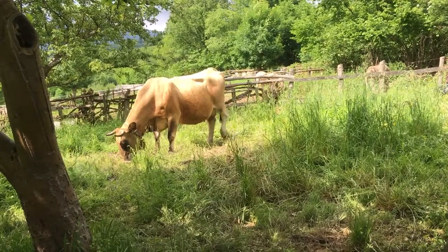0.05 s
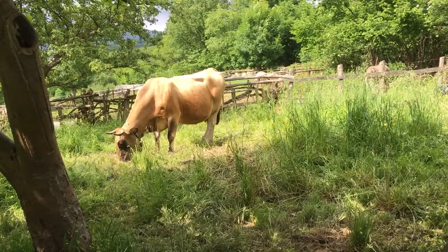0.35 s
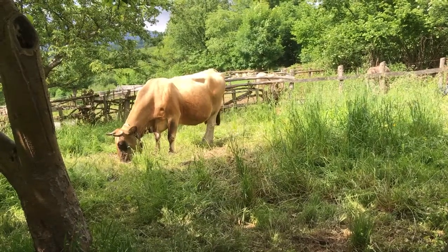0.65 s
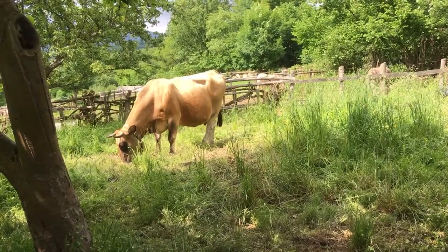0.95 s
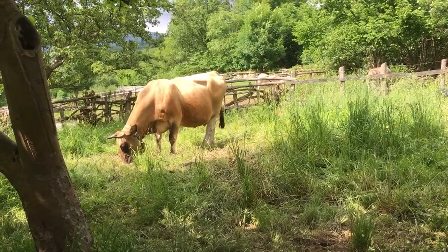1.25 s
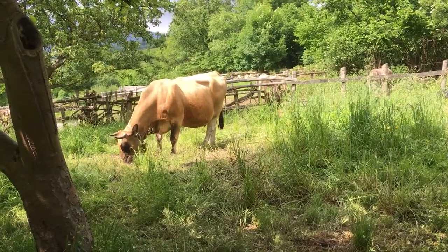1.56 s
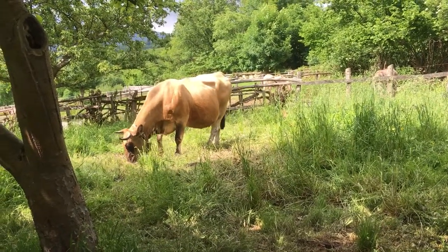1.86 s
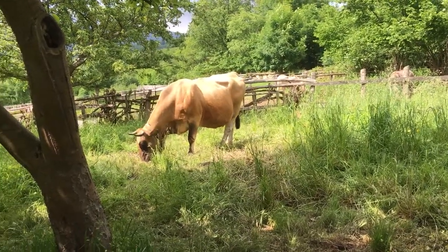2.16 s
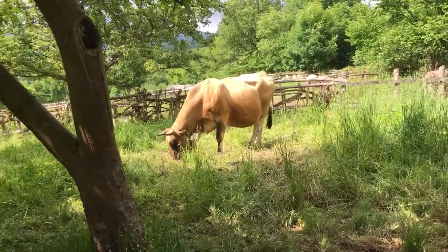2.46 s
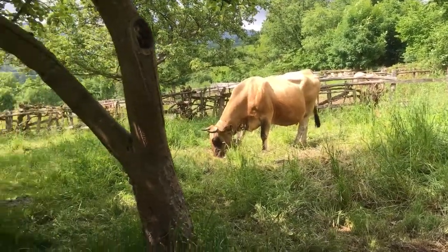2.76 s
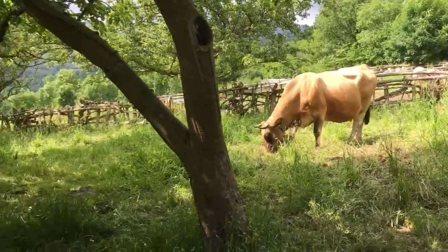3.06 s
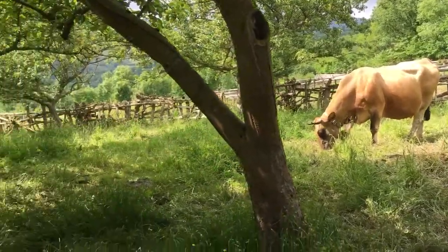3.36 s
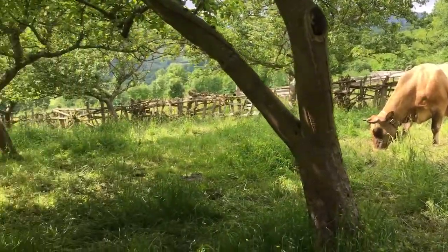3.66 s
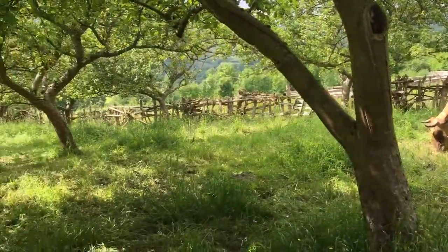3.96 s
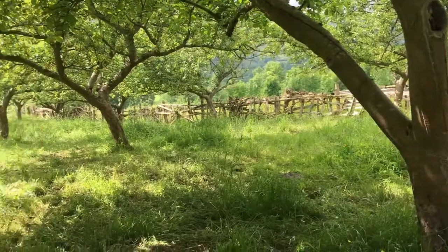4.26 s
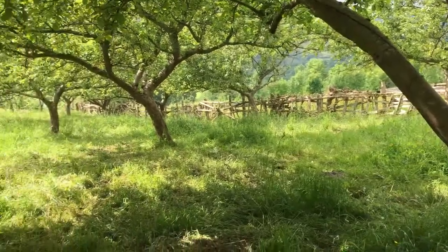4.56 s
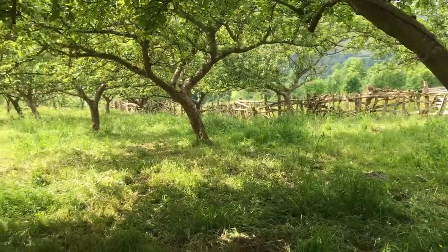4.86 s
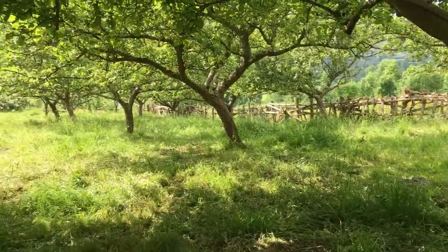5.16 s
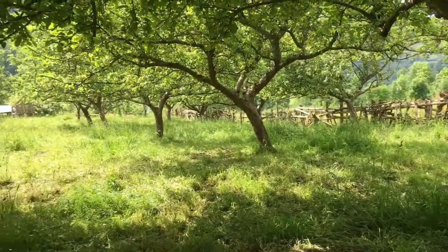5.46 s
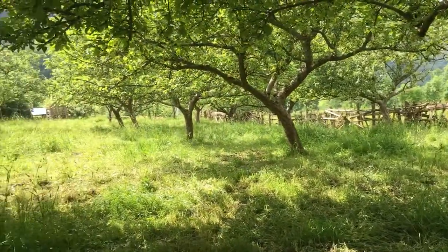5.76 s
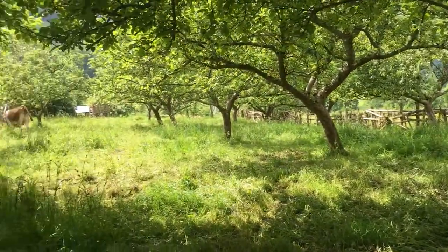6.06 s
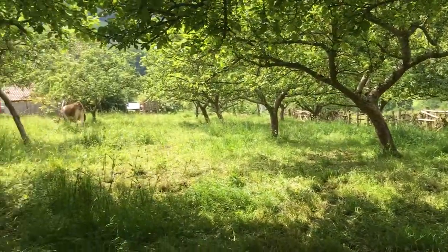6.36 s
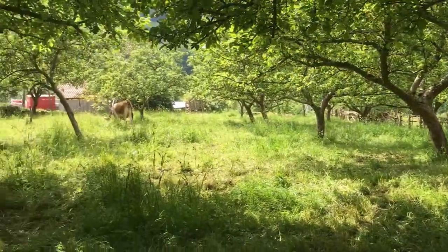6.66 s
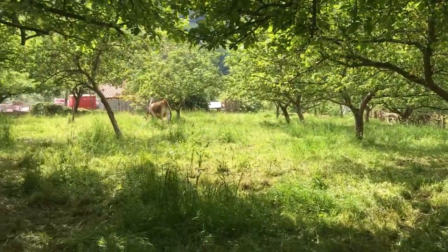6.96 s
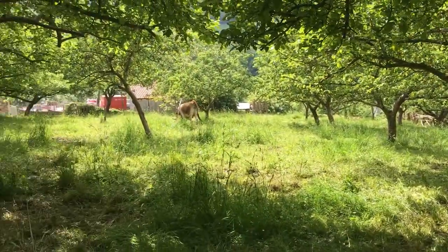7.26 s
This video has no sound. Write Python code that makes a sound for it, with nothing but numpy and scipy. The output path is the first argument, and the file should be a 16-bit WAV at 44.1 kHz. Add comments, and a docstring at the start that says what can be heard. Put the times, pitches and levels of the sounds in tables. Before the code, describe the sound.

A grazing cow's bell clanks unevenly in a quiet orchard, with faint cricket chirps, thin birdsong and rustling leaves behind it.

```python
"""A summer orchard, the microphone close to a grazing cow, with light air and a field cricket throughout.
Grass tears first, and her sheet-metal bell clanks: each blow checks the old ring and starts two low wall
modes, the air in the mouth and overtones that grow with the impact and bloom as the bell swings.
Near 2 s a second bell sounds far off and hers breaks into a flurry; from 3 s a small bird sings in the
treetops. Dry stalks snap at 5 s, the bird stops, and the near bell clanks on."""
import sys
import numpy as np
from scipy import signal
from scipy.fft import rfft, irfft, next_fast_len
from scipy.io import wavfile
from scipy.ndimage import uniform_filter1d

SR = 44100
rng = np.random.default_rng(int(sys.argv[2]) if len(sys.argv) > 2 else 0)


def output_pcm(signal):
    """Save a mono or channel-first signal as 16-bit PCM at the path in sys.argv[1].

    Samples are clipped to [-1, 1] before scaling.
    """
    pcm = np.clip(np.atleast_2d(signal).T, -1, 1) * 32767
    wavfile.write(sys.argv[1], SR, np.round(pcm).astype(np.int16))


N = 322812
TIME = np.arange(N) / SR
TOP_HZ = 15650

# murmur of the valley, far off: t/s, relative level/dB
VALLEY_LEVEL = [(0, -60), (1, -60), (1.5, -62), (2.1, -60.5), (3.2, -60), (3.8, -57), (4.8, -57.5),
                (5.4, -60.5), (6.2, -61), (7.32, -59)]
# its spectrum: f/Hz, relative density/dB
VALLEY_SPECTRUM = [(20, -34), (50, -12), (130, 2.5), (180, 0), (300, -9), (450, -17.5), (800, -14),
                   (1500, -16.5), (3000, -38), (8000, -49.5), (16000, -57)]
# leaves all round and a far chorus of crickets: f/Hz, relative density/dB
LEAF_SPECTRUM = [(300, -3.5), (1000, 1), (2000, 1), (3500, 0), (4400, -2.5), (5100, 3), (5600, -6),
                 (8000, -9.5), (12000, -9), (16000, -9)]
# light breeze on the microphone: t/s, level/dB
BREEZE_LEVEL = [(0, -62.5), (2, -61), (4.5, -58.5), (6, -62), (7.32, -66)]
# gusts on top of it: middle t/s, length/s, level/dB
MIC_GUSTS = [(1.034, 0.071, -50), (1.914, 0.42, -51.5), (2.145, 0.082, -46), (2.753, 0.84, -62.5)]
# blows of the distant bell: t/s, level/dB
FAR_BELL_BLOWS = [(1.81, -51.5), (2.13, -59), (2.44, -56), (3.83, -64), (4.02, -52.5), (4.19, -58)]
# clearest notes from the treetops: t/s, length/s, first f/Hz, last f/Hz, relative level/dB
BIRD_NOTES = [(2.978, 0.09, 8200, 7500, -66), (3.04, 0.05, 3300, 3070, -68), (3.201, 0.21, 3290, 3040, -70),
              (3.36, 0.014, 3500, 4350, -57), (4.22, .08, 7800, 8960, -62), (4.48, 0.064, 6150, 7400, -57),
              (4.549, 0.087, 8400, 7970, -61), (4.857, 0.042, 8030, 8250, -53),
              (4.887, 0.037, 4400, 3240, -53), (5.128, 0.033, 6270, 6120, -51),
              (5.39, 0.062, 4160, 3140, -57.5), (5.649, .066, 4400, 3900, -61)]
# course of the bird's fast twitters: t/s, relative level/dB, centre f/Hz
TWITTER_COURSE = [(3.799, -68.5, 5670), (4.2, -61, 7670), (4.55, -61, 6930), (5.1, -60.5, 7070),
                  (5.3, -60.5, 4830), (5.55, -71, 3790)]
# the cricket's bouts in the tall grass: first chirp t/s, last chirp t/s
CRICKET_BOUTS = [(-.04, .45), (.78, 1.02), (1.49, 1.72), (2.04, 3.12), (3.49, 3.74), (4.09, 5.29),
                 (5.7, 6.23), (6.81, 7.27)]
# dry stalks ticking: t/s, peak level/dB, centre f/Hz
STALK_TICKS = [(.375, -52, 9000), (1.097, -57, 7000), (1.387, -54, 6970), (5.022, -68, 1700),
               (5.052, -34.5, 1980), (5.107, -34.5, 1730), (6.091, -53, 7000), (6.29, -55, 7000)]
# hiss of grass torn at the muzzle: t/s, level/dB
TEAR_LEVEL = [(.1, -85), (.16, -56), (.28, -53), (.34, -63), (.42, -53.5), (.5, -66), (.55, -100)]

# modes of the near bell: f/Hz, level within the family/dB, t60/s
BELL_MODES = [(510.2, 0, 0.38), (538, 0, 0.097), (573.3, 0, 0.54), (1252.8, 0, 1.92), (1551, 0, 2.39),
              (2257, -8, 0.64), (2330, 2.5, 1.15), (2442, 0, 2), (2603, 8, 0.48), (2773, 9.5, 0.53),
              (2868, 3, 1.21), (3307, 7.5, 0.093), (3570, 1, 0.34), (3625, 4, 0.31), (3770, 4, 0.1),
              (3863, -4, 0.36), (3980, 2.5, 0.32), (4160, -5.5, 0.43), (4633, -2.5, 0.38),
              (4660, -2.5, 0.091), (4880, -0.5, 0.18), (5080, -1, 0.26), (5800, -13, 0.12),
              (6020, -14.5, 0.41), (6120, -12, 0.25), (6440, 1.5, 0.27), (6540, -5, 0.14), (6640, -21, 0.6),
              (7040, -3, 0.16), (6850, -11, 0.097), (8340, 3, 0.27)]
# borders between its ten families of modes (low wall, air in the mouth, high wall, hum, singing,
# lower ring pair, long ring, upper ring trio, clang, tinkle): f/Hz
FAMILY_EDGES = [522, 555, 900, 1400, 2000, 2400, 2500, 3050, 7400]
# clapper blows: t/s, strength/dB, spot on the rim/degrees (0 rings the low wall mode, 90 the high one),
# then relative to the strength: mouth air/dB, hum/dB, singing/dB, hardness of contact/dB
CLAPPER_BLOWS = [(-.15, -21.5, 42, -12, -19, -13, -2), (.1157, -21.5, 73, -3, -10.5, -21.5, -8),
                 (.752, -25, 84, 0.5, -14, -34, -8), (1.925, -28.5, 19.5, -2.5, -37, -35, -20.5),
                 (2.197, -24.5, 13, 0, -34.5, -51, -10.5), (2.27, -28, 85, -12, -23, -27, -9),
                 (2.33, -28.5, 59, 5, -33, -24, -12.5), (2.372, -33, 34, -11, -27, -14.5, -4),
                 (2.417, -39.5, 17, 7.5, -19, -3.5, -4), (2.471, -40, 31, 8.5, -5.5, -2, 1.5),
                 (2.546, -34.5, 33, 6.5, -17.5, -11, -10), (2.732, -22.5, 10, 1, -33, -9.5, -8),
                 (3.443, -21.5, 66.5, 3, -13.5, -18.5, -8), (3.618, -20.5, 13, -1.5, -38, -30, -19),
                 (3.66, -31.5, 35, 8.5, -34, -10, -2), (3.679, -32, 29, 3, -34, -10.5, -3.5),
                 (3.765, -37.5, 75, 2, -14.5, -9, -5.5), (4.094, -29.5, 58, 3, -24.5, -20.5, -11.5),
                 (4.329, -20.5, 27, -4.5, -39, -12, -4.5), (4.681, -34, 24, -1, -16.5, -10.5, -11),
                 (4.95, -23, 39.4, -4.5, -20, -14, -3), (5.204, -34.5, 69, -3, -9, -11.5, -7),
                 (5.511, -37, 40, 6.5, -13.5, -14, -6), (5.838, -28, 27.4, -4.5, -31, -31, -9.5),
                 (6.158, -25.5, 59, -5, -23, -23.5, -7), (6.417, -19.5, 60, -14, -20, -25, -5),
                 (6.707, -32, 48, -4.5, -18, -12.5, -7.5), (7.025, -30, 37, -3.5, -40, -19, -4.5)]
# growth with the impact, a row per family from pair to tinkle: level at medium impact/dB, slope/(dB/dB)
OVERTONE_GROWTH = [(-49.5, 0.81), (-54.5, .7), (-47, 1.1037), (-37.5, 1.0232), (-45, 1.6)]
# overtones trade places as the bell shifts on its strap:
# t/s, pair gain/dB, trio gain/dB, shift from clang to tinkle/dB
STRAP_BALANCE = [(.1, 5, -7.5, 1), (.75, 4.5, -7, 0.5), (2.2, -8, -3.5, 2.5), (2.28, 6, -0.5, 1),
                 (2.73, 3, -11.5, -2), (3.44, -5.5, -1, -.5), (4.33, -4.5, 4, 0.5), (4.95, 8, 6, -0.5),
                 (5.3, -0.5, 8, -1), (5.85, -6.5, -0.5, 0.5), (6.42, -1.5, -3.5, 2.8), (7.03, -4, -2, 2.5)]
# one long overtone fades quickly as the bell swings away from the microphone: t/s, f/Hz, loss/dB
OVERTONE_DIPS = [(.19, 1551, 6), (1.04, 1253, 7.5), (2.79, 1551, 19), (3.5, 1253, 20), (4.21, 1551, 16),
                 (6.81, 1551, 12)]
# an overtone's lobe swings towards the microphone: middle t/s, f/Hz, gain/dB
LOBE_BLOOMS = [(1.15, 2442, 5), (3.17, 2442, 11.5), (3.251, 1551, 11), (3.88, 2442, 12.5), (4.4, 2442, 8),
               (4.6, 2868, 9), (4.85, 2442, 12), (5.87, 2442, 5), (6.82, 2442, 3.5), (7.2, 2442, 5.5),
               (7.28, 1551, 8.5)]


def undb(db):
    """Decibels to gain."""
    return 10 ** (np.asarray(db) / 20)


def unit(x):
    """Scale to rms 1."""
    return x / np.sqrt(np.mean(x ** 2))


def curve(rows):
    """Join (t/s, value) rows by straight lines."""
    return np.interp(TIME, *np.transpose(rows))


def fade(t, t60):
    """Free decay: 60 dB down after t60."""
    return np.exp(-np.log(1000) * t / t60)


def swell(middle, length):
    """A smooth hump from 0 up to 1 and back."""
    return np.cos(np.pi * np.clip((TIME - middle) / length, -.5, .5)) ** 2


def add(out, s, x):
    """Mix x into out from time s."""
    i = int(s * SR)
    x = x[max(-i, 0):max(N - i, 0)]
    out[max(i, 0):max(i, 0) + len(x)] += x


def walk(rate):
    """Smooth random drift of rms 1 that turns about rate times a second."""
    hold = int(SR / rate)
    steps = np.repeat(rng.standard_normal(N // hold + 2), hold)
    return unit(uniform_filter1d(steps, hold)[rng.integers(hold):][:N])


def noise(spectrum):
    """Noise of rms 1, shaped by (f/Hz, relative density/dB) rows."""
    hz, db = np.transpose(spectrum)
    n = next_fast_len(N, True)
    gain = undb(np.interp(np.log(np.fft.rfftfreq(n, 1 / SR) + 1), np.log(hz), db))
    return unit(irfft(rfft(rng.standard_normal(n)) * gain, n)[:N])


def scatter(x, t60):
    """Countless faint echoes from grass, trunks and leaves, with about the power of the sound itself."""
    t = np.arange(int(t60 * SR)) / SR
    echoes = rng.standard_normal(len(t)) * fade(t, t60)
    return signal.oaconvolve(x, echoes / np.linalg.norm(echoes))[:N]


def wind_on_microphone(flutter_db=3.5, flutter_rate=14):
    """Low buffets right at the microphone: a fluttering breeze, and gusts that swell and die."""
    breeze = undb(curve(BREEZE_LEVEL) + flutter_db * walk(flutter_rate))
    gusts = sum(undb(db) * swell(s, length) for s, length, db in MIC_GUSTS)
    rumble = noise([(12, -40), (28, -20), (48, -1.5), (80, -5), (130, -12.5), (300, -37.5), (1000, -78)])
    return (breeze + gusts) * rumble


def valley(lift_db=2):
    """The low murmur of open country beyond the orchard."""
    return undb(curve(VALLEY_LEVEL) + lift_db + walk(9)) * noise(VALLEY_SPECTRUM)


def leaves(level_db=-64, drift_db=0.47, flicker_db=0.9):
    """A fine, flickering rustle from the trees all round, with far crickets as a band near 5 kHz."""
    return undb(level_db + drift_db * walk(1.66) + flicker_db * walk(35)) * noise(LEAF_SPECTRUM)


def far_bell(hz=778, t60=0.41, rise_s=0.0019):
    """Of a distant cow's bell only the softened low note reaches the microphone."""
    out, t = np.zeros(N), TIME[:SR // 2]
    note = (1 - np.exp(-t / rise_s)) * fade(t, t60) * np.sin(2 * np.pi * hz * t)
    for s, db in FAR_BELL_BLOWS:
        add(out, s, undb(db) * note)
    return out


def twitters(count=70, length_s=0.0239, spread_octaves=0.36, glide_octaves=0.206):
    """A run of tiny random glides among the bird's clearer notes, as rows like BIRD_NOTES."""
    at, db, centre_hz = np.transpose(TWITTER_COURSE)
    times = np.linspace(at[0], at[-1], count) + 0.0069 * rng.standard_normal(count)
    first_hz = np.interp(times, at, centre_hz) * 2 ** (spread_octaves * rng.uniform(-1.5, 1, count))
    last_hz = first_hz * 2 ** (glide_octaves * rng.uniform(-0.91, 1, count))
    return list(zip(times, np.full(count, length_s), first_hz, last_hz, np.interp(times, at, db)))


def bird(trill_hz=130, trill_depth=0.033, direct_db=-9, wood_db=-2, wood_t60=0.64):
    """Thin buzzy glides from the treetops, reaching the microphone mostly as echoes."""
    out = np.zeros(N)
    for s, length, first_hz, last_hz, db in list(BIRD_NOTES) + twitters():
        t = TIME[:int(length * SR)]
        trill = 1 + trill_depth * np.sin(2 * np.pi * (trill_hz * t + rng.random()))
        hz = np.linspace(first_hz, last_hz, len(t)) * trill
        note = np.sin(2 * np.pi * np.cumsum(hz) / SR) * np.sin(np.pi * t / length)
        add(out, s, undb(db) * unit(note))
    return undb(direct_db) * out + undb(wood_db) * scatter(out, wood_t60)


def cricket(hz=4850, level_db=-59.3, period_s=0.275, length_s=0.15, stroke_rate=30, sag=0.072, rasp=0.017):
    """Raspy wing strokes, each sagging in pitch, grouped into even chirps and blurred by tall grass."""
    out, t = np.zeros(N), TIME[:int(length_s * SR)]
    envelope = np.sqrt(np.sin(np.pi * t / length_s))
    for first, last in CRICKET_BOUTS:
        for s in np.linspace(first, last, round((last - first) / period_s) + 1):
            stroke = (t * stroke_rate * (1 + 0.036 * rng.standard_normal())) % 1
            pulses = np.sin(np.pi * stroke) ** 0.49
            # the scraper crosses the file unevenly
            teeth = unit(uniform_filter1d(rng.standard_normal(len(t)), size=90))
            phase = 2 * np.pi * np.cumsum(hz * (1 + rasp * teeth + sag * (.5 - stroke))) / SR
            wing = np.sin(phase) + undb(-11) * np.sin(2 * phase) + undb(-15) * np.sin(3 * phase)
            add(out, s, undb(level_db) * unit(wing * pulses * envelope))
    return scatter(out, t60=0.16)


def grass(tick_t60=0.025, tick_q=4, flicker_db=2):
    """Close by, at the muzzle, dry stalks tick and a mouthful of grass tears with a hiss."""
    ticks, t = np.zeros(N), TIME[:SR // 20]
    for s, db, hz in STALK_TICKS:
        snap = rng.standard_normal(len(t)) * fade(t, tick_t60)
        tick = signal.lfilter(*signal.iirpeak(hz, tick_q, SR), snap)
        add(ticks, s, undb(db) * tick / np.abs(tick).max())
    tearing = undb(curve(TEAR_LEVEL) + flicker_db * walk(84))
    return ticks + tearing * noise([(2000, -34), (6000, -6), (12000, 0), (16000, 5.5)])


def blow_levels(medium_impact_db=-37):
    """Level/dB of each family, a row per blow: the spot splits the low note, the impact brightens."""
    times, strength, spot, mouth, hum, singing, hardness = np.transpose(CLAPPER_BLOWS)
    angle = np.radians(np.clip(spot, 1, 89))
    low_wall, high_wall = 20 * np.log10([np.cos(angle), np.sin(angle)])
    lower = strength + np.array([low_wall, mouth, high_wall, hum, singing])
    impact = strength + hardness - medium_impact_db
    pair, long_ring, trio, clang, tinkle = (db + slope * impact for db, slope in OVERTONE_GROWTH)
    at, *balance = np.transpose(STRAP_BALANCE)
    pair_db, trio_db, shift_db = (np.interp(times, at, column) for column in balance)
    upper = [pair + pair_db, long_ring, trio + trio_db, clang - shift_db, tinkle + shift_db]
    return np.vstack([lower, *upper]).T


def clapper(crack_db=-2, crack_t60=0.055, crack_slope=0.092, knock_db=-9, knock_t60=0.085):
    """Iron chatters on iron for an instant: a duller knock, and a bright crack that grows with force."""
    crack, knock, t = np.zeros(N), np.zeros(N), TIME[:SR // 4]
    attack = 1 - np.exp(-t / 0.00052)
    levels = blow_levels()
    hardest_db = levels[:, -1].max()
    for (s, *_), (*_, clang_db, tinkle_db) in zip(CLAPPER_BLOWS, levels):
        force_db = tinkle_db + crack_slope * (tinkle_db - hardest_db)
        add(crack, s, undb(force_db + crack_db) * attack * fade(t, crack_t60))
        add(knock, s, undb(clang_db + knock_db) * attack * fade(t, knock_t60))
    crack *= noise([(1500, -50), (3500, 10), (6000, 11.5), (11000, 0.5), (13000, 3), (16000, -36)])
    knock *= noise([(150, -57), (450, -0.5), (1000, -4.5), (1600, 3.5), (2100, -9), (3400, 0),
                    (7000, -6), (16000, -30)])
    return crack + knock


def bell_modes(count=64, spread_db=3, tilt_db_per_octave=-2):
    """The listed modes plus a thicket of short treble ones; each family shares out a power of 1."""
    treble_hz = np.linspace(FAMILY_EDGES[-1] + 100, TOP_HZ, count) + rng.uniform(-55, 55, count)
    tilt_db = tilt_db_per_octave * np.log2(treble_hz / treble_hz[0])
    treble_db = spread_db * rng.standard_normal(count) + tilt_db
    treble_t60 = 0.15 * np.sqrt(10000 / treble_hz)
    hz, db, t60 = np.vstack([BELL_MODES, np.column_stack([treble_hz, treble_db, treble_t60])]).T
    family = np.searchsorted(FAMILY_EDGES, hz)
    family_power = np.bincount(family, undb(db) ** 2)
    return hz, undb(db) / np.sqrt(family_power[family]), t60, family


def low_phases(low_wall, mouth, high_wall):
    """The air in the mouth first opposes the two wall modes, so the low note swells from rest."""
    cosine = (mouth ** 2 - low_wall ** 2 - high_wall ** 2) / (2 * low_wall * high_wall)
    turn = -np.arccos(np.clip(cosine, -1, 1))
    return 0, np.angle(-low_wall - high_wall * np.exp(1j * turn)), turn


def overtone_dip(s, gap, t, hz, dip_s=0.09):
    """Gain of the mode at hz, struck at s: it fades quickly if the bell swings away from the microphone."""
    loss_db = sum(db * np.clip((s + t - at) / dip_s, 0, 1) for at, overtone_hz, db in OVERTONE_DIPS
                  if s < at < s + gap and abs(overtone_hz - hz) < hz / 10)
    return undb(-loss_db)


def bloom(k, hz, length_s=0.36):
    """Gain/dB of mode k as its lobes sweep past the microphone."""
    return sum(db * swell(s, length_s) for s, overtone_hz, db in LOBE_BLOOMS
               if np.argmin(abs(hz - overtone_hz)) == k)


def cowbell(vary_db=3.6, swing_db=2, swing_rate=9, long_t60=0.8, contact_s=0.012, spread_cycles=4):
    """The near bell: each blow stops the last ring and restarts all modes; long ones waver as it turns."""
    hz, share, t60, family = bell_modes()
    times = np.array(CLAPPER_BLOWS)[:, 0]
    gaps = np.diff(times, append=N / SR)
    # each blow lands on a new spot and shares its energy differently within a family
    shares = share * undb(vary_db * rng.standard_normal((len(times), len(hz))))
    shares /= np.sqrt(shares ** 2 @ (family[:, None] == family))
    sizes = undb(blow_levels()[:, family]) * shares
    phases = rng.uniform(0, 2 * np.pi, sizes.shape)
    phases[:, :3] = [low_phases(*row[:3]) for row in sizes]
    # overtones need a few cycles to spread over the shell
    rise_s = 0.00062 + (family > 2) * spread_cycles / hz
    out = np.zeros(N)
    for k in range(len(hz)):
        mode = np.zeros(N)
        for s, gap, size, phase in zip(times, gaps, sizes[:, k], phases[:, k]):
            t = TIME[:int(min(gap + 10 * contact_s, t60[k]) * SR)]
            envelope = size * (1 - np.exp(-t / rise_s[k])) * fade(t, t60[k])
            next_blow_damping = np.exp(-np.maximum(t - gap, 0) / contact_s)
            envelope *= next_blow_damping * overtone_dip(s, gap, t, hz[k])
            add(mode, s, envelope * np.sin(2 * np.pi * hz[k] * t + phase))
        if t60[k] > long_t60:
            mode *= undb(bloom(k, hz) + swing_db * walk(swing_rate))
        out += mode
    return out


def scene(orchard_db=-25, orchard_t60=0.35):
    """One microphone in the open: the bell close up, a faint return from the trees, the meadow behind."""
    bell = cowbell() + clapper()
    tree_echoes = undb(orchard_db) * scatter(bell, orchard_t60)
    meadow = cricket() + bird() + far_bell() + grass() + wind_on_microphone() + valley() + leaves()
    return (bell + tree_echoes + meadow)[None]


def record(dry):
    """The recorder cuts the treble steeply above TOP_HZ."""
    return signal.sosfilt(signal.ellip(10, .2, 80, TOP_HZ, fs=SR, output="sos"), dry)


dry = scene()
out = record(dry)
output_pcm(out)
```